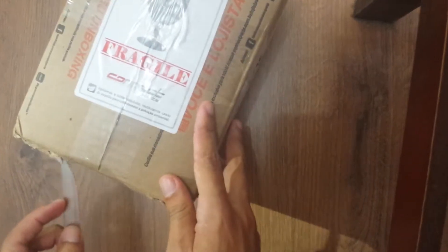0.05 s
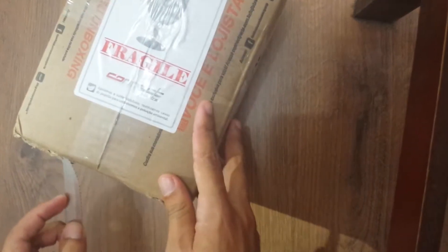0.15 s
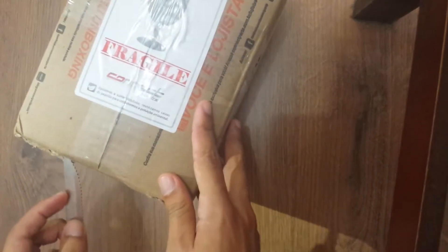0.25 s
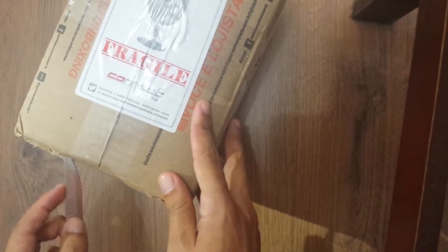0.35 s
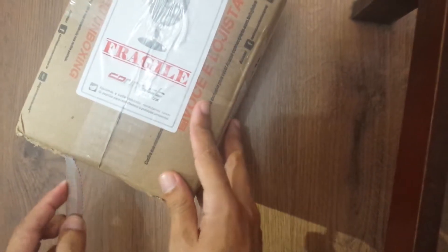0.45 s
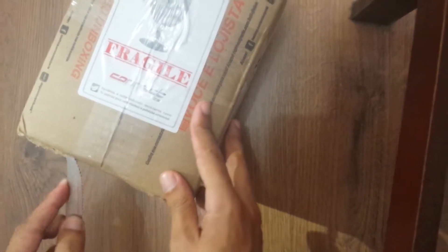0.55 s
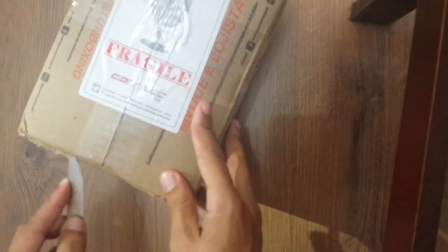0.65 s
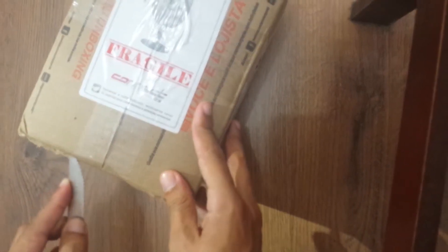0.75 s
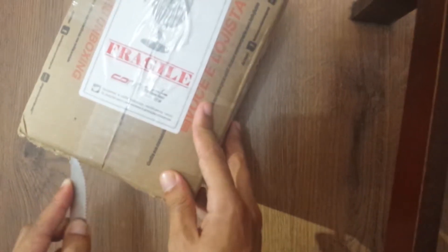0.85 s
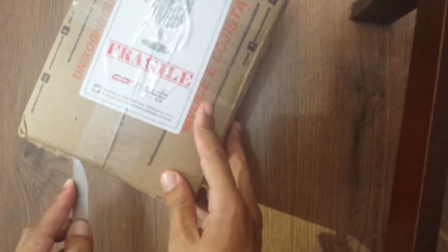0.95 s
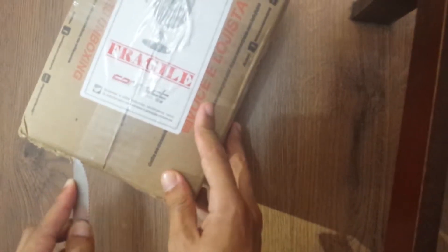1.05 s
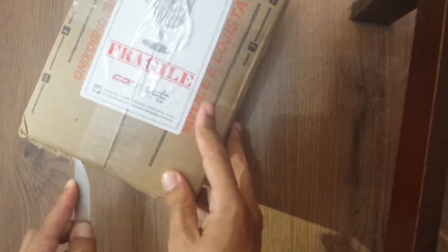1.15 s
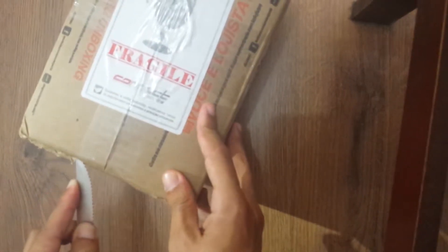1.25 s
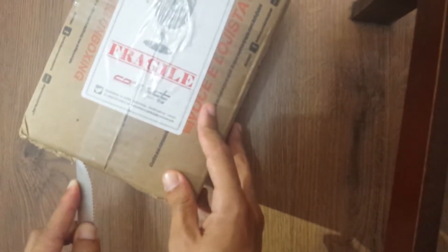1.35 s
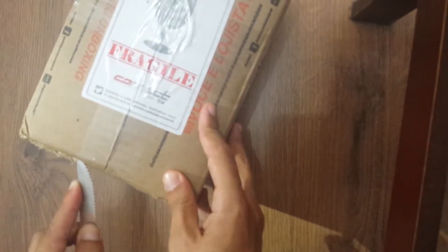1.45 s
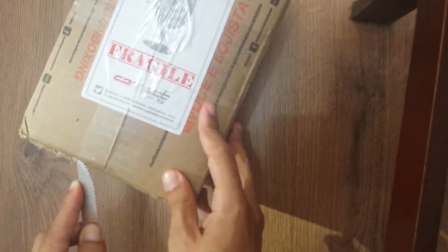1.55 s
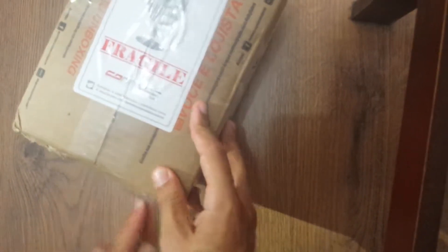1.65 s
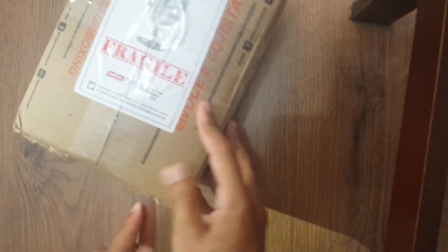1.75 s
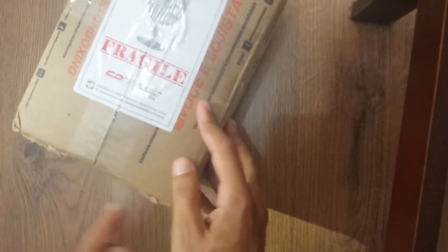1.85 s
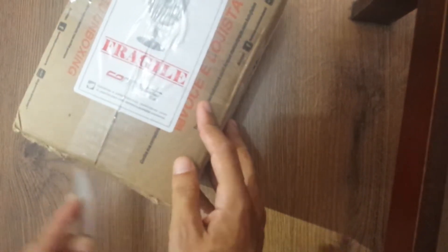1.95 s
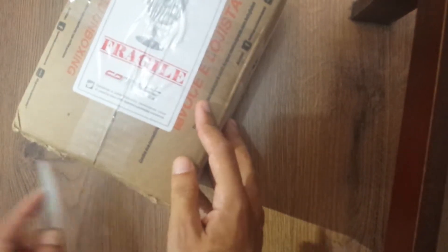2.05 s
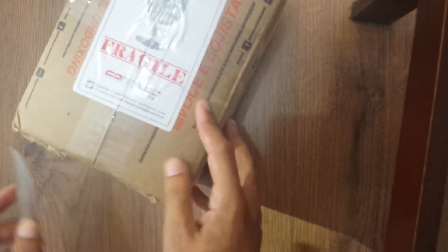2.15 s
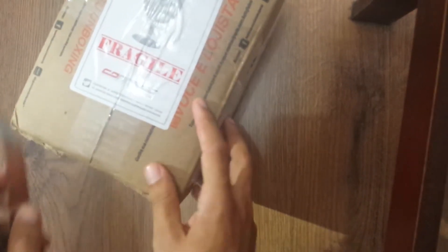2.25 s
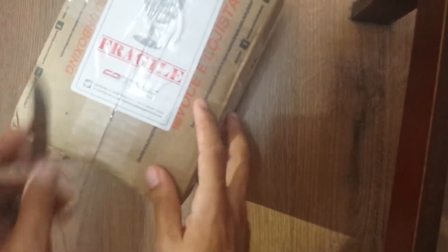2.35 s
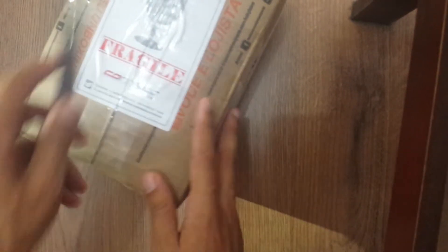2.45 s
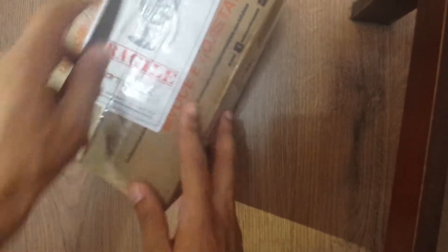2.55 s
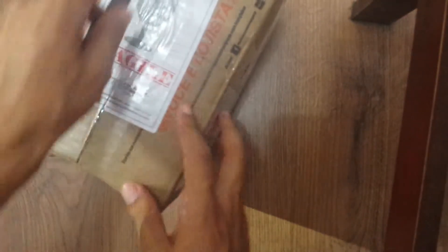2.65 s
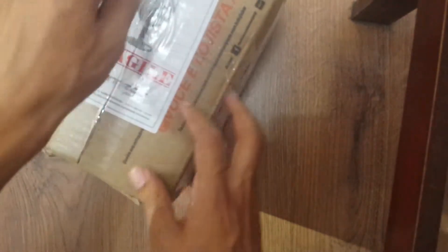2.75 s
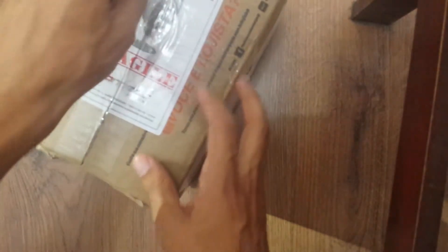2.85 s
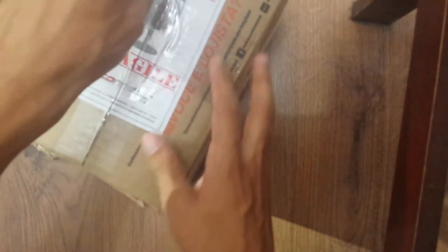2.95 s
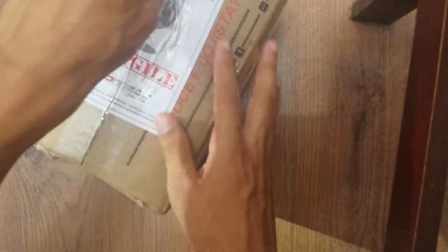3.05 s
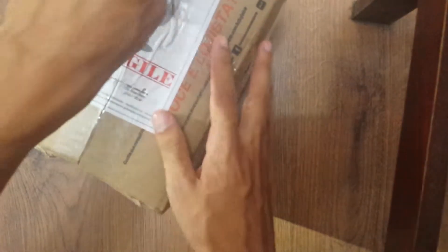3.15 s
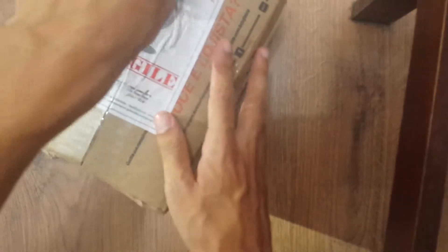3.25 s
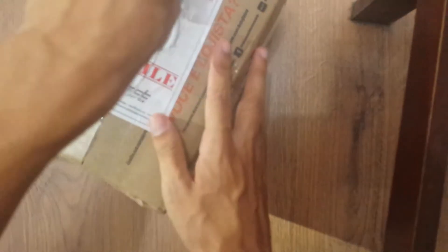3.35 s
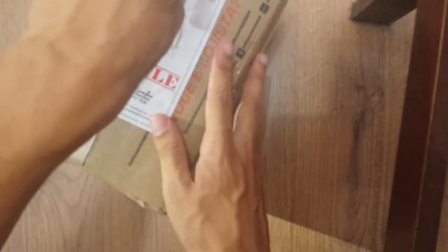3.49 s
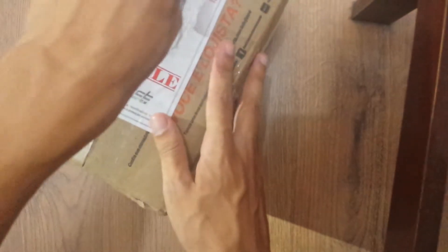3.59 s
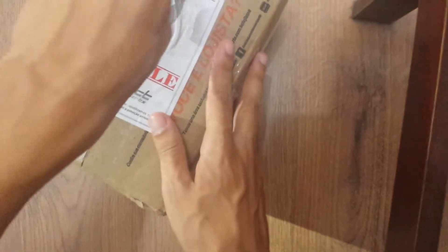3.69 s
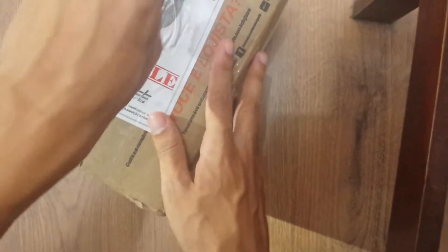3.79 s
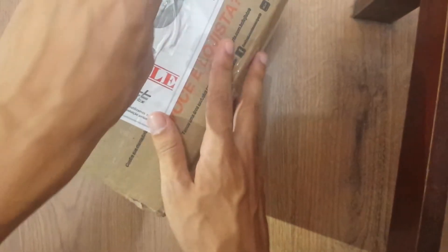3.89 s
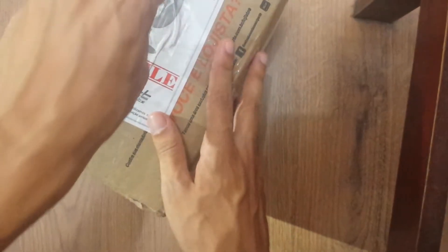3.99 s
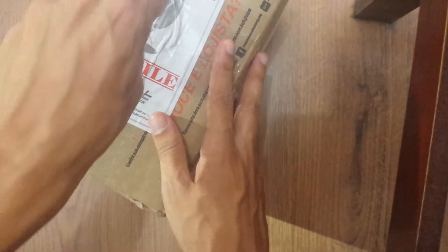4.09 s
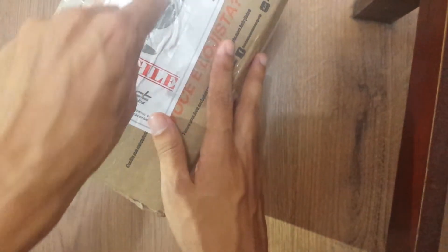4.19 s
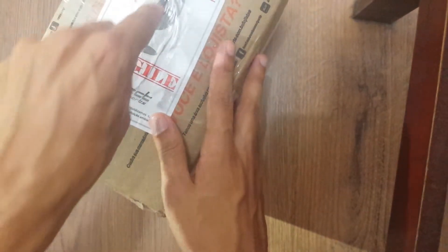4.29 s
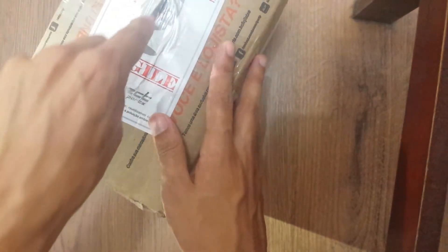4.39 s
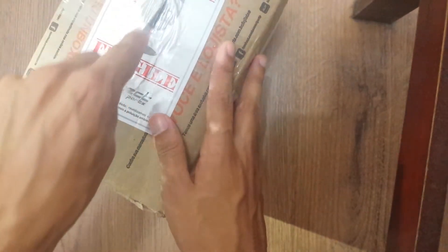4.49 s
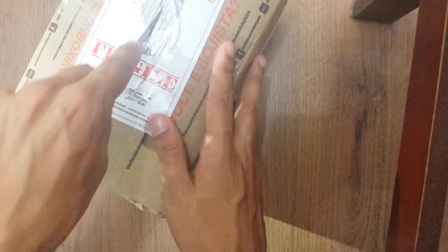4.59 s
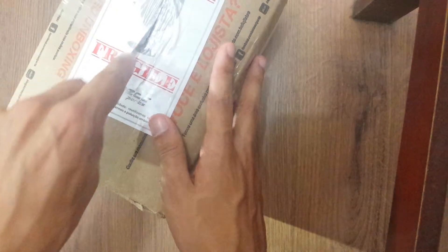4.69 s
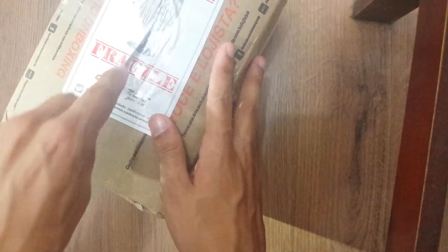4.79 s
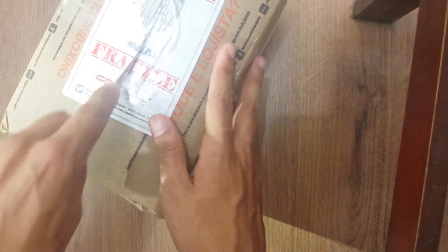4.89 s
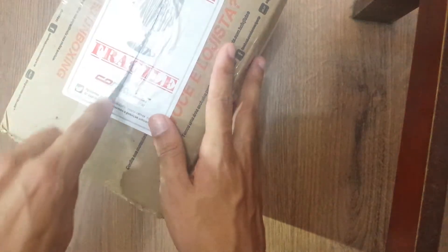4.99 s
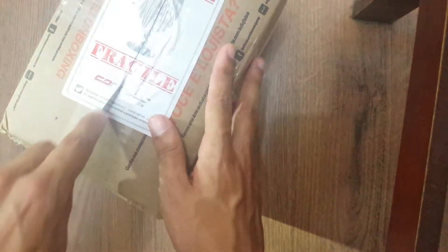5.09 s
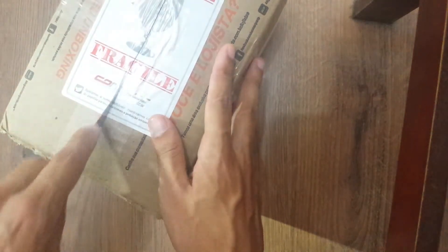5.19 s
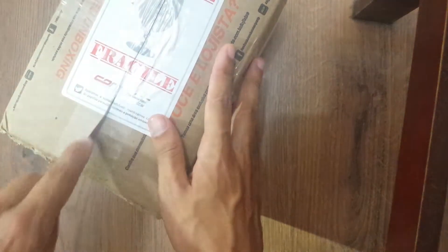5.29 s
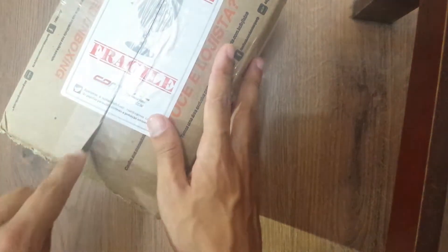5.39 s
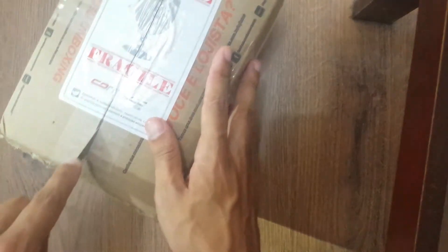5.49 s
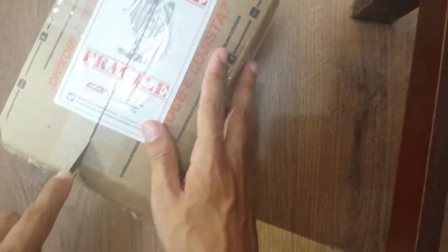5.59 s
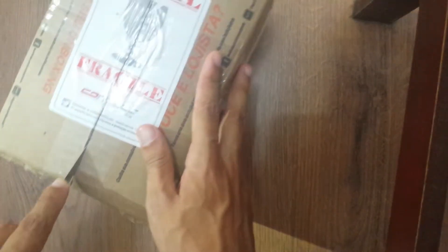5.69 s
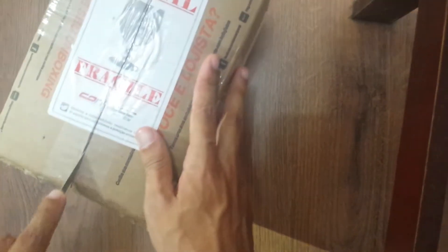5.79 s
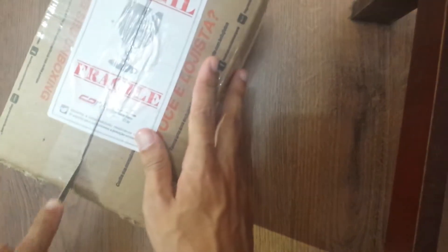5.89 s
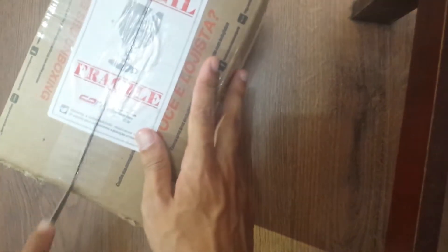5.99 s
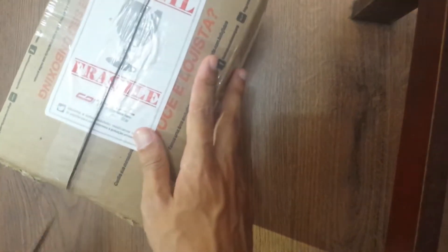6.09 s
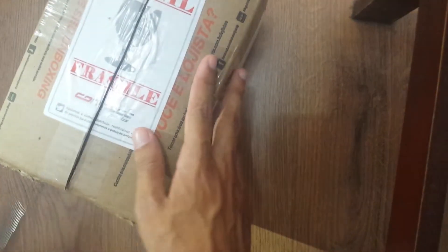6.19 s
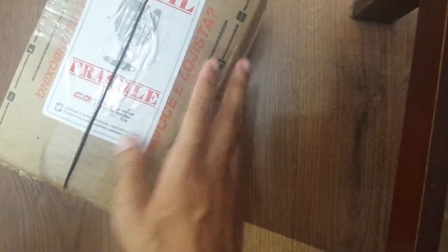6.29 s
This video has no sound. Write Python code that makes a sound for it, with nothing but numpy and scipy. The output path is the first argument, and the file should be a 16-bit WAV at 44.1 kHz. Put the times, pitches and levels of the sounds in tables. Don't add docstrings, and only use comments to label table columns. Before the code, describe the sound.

Close to the microphone in a hard-floored room, fingers and a blade lightly brush a cardboard box, with a small snap at 0.1 s, tiny film ticks and a muted tap around 1.3 s. At 1.7 s the blade slips off the edge: a sharp crack with a brief scrape and hollow thud. Soft rubbing continues, swelling near 2.6 s, with faint taps. Small snaps at 3.5 s lead to a bright burst at 3.6 s, then a gritty, uneven cut with strong snaps near 3.96 and 4.2 s. The box drums hollowly, and a knocking cluster lands at 5.1 s. Around 5.25-5.4 s comes a thin, very high chirp, then drier scraping and nicks. At 6.13 s the blade jerks free with pops and a thump, fading into quiet air, low rumble and faint hum. Direct sound favours the right; reflections are short.

```python
import sys
import numpy as np
from scipy import signal
from scipy.fft import rfft, irfft, next_fast_len
from scipy.io import wavfile
from scipy.ndimage import uniform_filter1d, map_coordinates

SR = 44100
rng = np.random.default_rng(int(sys.argv[2]) if len(sys.argv) > 2 else 0)


def magnitude_from_level(level_db):
    exponent = np.asarray(level_db, float) / 20
    return 10 ** exponent


def generate_wav(signal):
    frames = np.transpose(np.atleast_2d(signal))
    scaled = np.clip(frames, -1, 1) * 32767
    pcm = np.round(scaled).astype(np.int16)
    wavfile.write(sys.argv[1], SR, pcm)


N = 279324

# (peak t/s, level/dB, film over card/dB, rise/s, fall/s), 20 dB each way
BRUSH_STROKES = [(0.022, -66, 4, 0.03, 0.018), (0.11, -58, -3, 0.077, 0.18),
                 (0.266, -63.5, -2, 0.099, 0.018), (0.52, -69, -1.5, 0.49, 0.22),
                 (0.748, -69, 1, .02, 0.28), (0.86, -63, 1, 0.011, .03), (0.983, -52, -2, 0.08, 0.012),
                 (1.284, -63, -7, 0.0099, 0.014), (1.562, -71, 3, .03, .1), (1.654, -67, -3, .015, 0.11),
                 (2.152, -68, -6, 0.14, 0.079), (2.284, -73, -9, 0.047, 0.046), (2.4, -63.5, -20, 0.14, .4),
                 (2.632, -55, -1.5, 0.35, 0.24), (2.9, -64.5, -2, 0.052, 0.71),
                 (3.15, -67.5, -4, 0.88, 0.12), (3.292, -60.5, -4, 0.1, 0.021),
                 (3.454, -65, 1, 0.15, 0.017), (3.53, -60.5, 4.5, 0.097, 0.12),
                 (3.612, -37, 5.5, 0.0054, 0.12), (5.115, -31, -15, 0.033, 0.14)]
# (t/s, pressure level/dB, film over card/dB)
EDGE_SLIP = [(1.685, -78, 4), (1.693, -35, -3), (1.699, -34, -1), (1.72, -30.5, 0.5), (1.74, -27.5, 0.5),
             (1.757, -29.5, -3), (1.8, -45, -18), (1.84, -44.5, 0.5), (1.9, -56, -2), (1.948, -50.5, -4),
             (2.05, -104, -3)]
# (t/s, pressure level/dB, film over card/dB)
LONG_CUT = [(3.56, -88, 0), (3.72, -48, 0.5), (3.79, -54, 2), (3.945, -43.5, -2), (4.02, -43.5, -0.5),
            (4.17, -44, -4.5), (4.25, -41, 0.5), (4.31, -46, -0.5), (4.564, -48.5, 3), (4.66, -50, -2),
            (4.93, -44, -1.5), (5.059, -44, -1), (5.2, -40.5, -2), (5.432, -37, -3), (5.5, -43, -5),
            (5.7, -46.5, 5), (5.77, -45, 1.5), (5.93, -51.5, 0.5), (5.96, -45.5, -1)]
# (t/s, pressure level/dB, film over card/dB)
FINAL_JERK = [
    (5.95, -79, 15),
    (5.976, -49.5, 5.5),
    (6.06, -44, 7),
    (6.1, -36, -1),
    (6.134, -36.5, 0),
    (6.154, -46, -49),
    (6.218, -64, -11),
    (6.33, -73, 14.5),
]
# (t/s, level over pressure/dB)
LID_DRUMMING = [(0, 12), (0.12, 2), (0.45, 8), (1.0, -4.5), (1.65, -5), (1.72, -6.5), (1.86, 1),
                (2.0, -0.5), (2.6, 2.5), (3.4, -2.5), (3.88, -0.5), (4.0, 0.5), (4.6, 8.5), (5.0, 0.5),
                (5.15, -1), (5.4, -5), (5.9, 1.5), (6.16, -4)]
# (t/s, centre f/Hz, height/dB)
FILM_RING = [(3.75, 9400, 3), (3.86, 8720, 6), (4.12, 8450, 3.5), (4.42, 8600, 1), (4.5, 10200, 8.5),
             (4.62, 10100, 4), (4.72, 9000, 5), (5.05, 9000, 7.5), (5.26, 8800, 6), (5.35, 9760, 10),
             (5.48, 8400, -3), (5.97, 8350, 5.5), (6.15, 8500, 8.5), (6.2, 8240, 0)]
# (f/Hz, level/dB)
STEEL_SPECTRUM = [(530, -28.5), (900, -7.5), (1210, -10), (1590, -6), (1900, -6.5), (3150, -6),
                  (4390, -4.5), (7050, -6.5), (8320, -6), (13300, -11), (15200, -18)]
# (t/s, peak level/dB, box knock/dB, brightness/dB per octave)
TAPE_SNAPS = [(0.0871, -31, -14, 1), (1.702, -26, -38, -2), (1.705, -14, -21, -1), (3.288, -45, 6, -4),
              (3.4794, -31.5, -15, 3.5), (3.499, -24.5, -9.5, 1.5), (3.516, -40, -24, -2),
              (3.601, -27, -32, 2), (3.603, -6.5, -34, 1.8), (3.6057, -12, -26, -1), (3.6084, -19, -31, 2),
              (3.6149, -17, -32, 2), (3.62, -13, -22, -1), (3.634, -18, -28, 0), (3.673, -20, -34, -1),
              (3.6762, -16.5, -30, 0.5), (3.9564, -6, -27, 1.5), (3.9711, -7, -30, -0.5),
              (3.974, -16, -20, -1), (4.057, -22, -3, -4.5), (4.1809, -3.5, -23, 8), (4.183, -10, -6, 1.5),
              (4.187, -13, -14.5, 4), (4.197, -16, -9, -3), (4.2169, -9.5, -37, 5), (4.2215, -9.5, -30, 8),
              (4.223, -21, -29, 1), (4.3137, -20.5, -9, -2), (4.4443, -30.5, -1, -4),
              (4.4606, -25, -11, -2.5), (4.7154, -26.5, -3.5, 4), (4.726, -26, -14, 0.5),
              (4.9774, -17, -10, -4.5), (5.0691, -18.5, 1.5, -3), (5.076, -9, -15, -1),
              (5.082, -14, -13, 0), (5.0841, -12.5, -10, -2.5), (5.0864, -14.5, -13, -4),
              (5.088, -8, -6.5, -2), (5.1006, -11.5, -9.5, 4), (5.9676, -19, -31, 5), (6.1281, -19, -18, 2),
              (6.1321, -9.5, -20, 5), (6.1337, -13.5, -15, 1.5), (6.137, -19.5, -6.5, 2),
              (6.139, -21, -10, 3)]
# (f/Hz, level/dB)
CRACK_SPECTRUM = [(290, -66), (500, 2.5), (860, -3.5), (1150, 1), (1440, -6.5), (1890, 0.5), (2440, -3),
                  (8220, -1), (12400, -4), (15200, -16)]
# (peak t/s, level/dB, centre f/Hz)
CHIRP_BUNCHES = [(5.256, -22.5, 13200), (5.285, -23, 9250), (5.3, -17, 13500), (5.314, -17, 9500),
                 (5.334, -13, 8640), (5.336, -11, 13400), (5.34, -12.5, 10000), (5.342, -8, 13800),
                 (5.349, -6, 13870), (5.355, -11, 12600), (5.362, -10.5, 14100), (5.375, -18, 12300),
                 (5.432, -31, 9900), (5.512, -25.5, 10500), (5.515, -24.5, 8200)]
# (t/s, peak level/dB, centre f/Hz)
FILM_TICKS = [(0.017, -47, 8500), (0.229, -45, 8280), (0.258, -50, 4490), (0.4514, -65, 6500),
              (0.6874, -56.5, 6020), (0.751, -50, 5980), (0.826, -50, 5290), (0.863, -44, 9900),
              (0.864, -46.5, 1460), (0.8794, -50, 9550), (0.9333, -46, 8900), (0.9483, -41, 8550),
              (0.9795, -30, 11000), (0.9898, -37.5, 8200), (1.562, -47, 8000), (1.6686, -51, 8310),
              (1.7025, -6.5, 6640), (1.713, -18, 8050), (1.7235, -16, 6200), (1.953, -35.5, 8100),
              (3.455, -62, 5110), (3.5984, -35, 9000),
              (3.778, -18.5, 10000), (4.164, -33, 1200), (4.422, -32.5, 7500), (5.304, -17, 10500),
              (5.314, -29, 9800), (5.4194, -28, 13400), (5.44, -27, 9500), (5.4508, -24, 8300),
              (5.5234, -24.5, 8100), (5.5501, -19, 10200), (5.567, -31, 10000), (5.572, -38, 9000),
              (5.678, -30, 7860), (5.6944, -31, 8260), (5.7148, -21.5, 7900), (5.806, -23.5, 8000),
              (5.941, -28, 8820), (5.964, -20.5, 12000), (6.0066, -28, 10600), (6.071, -26, 8180),
              (6.1036, -20, 8300), (6.1137, -16, 8600), (6.117, -14, 8800), (6.126, -24, 8500),
              (6.29, -39, 8930), (6.319, -46, 6550)]
# (t/s, peak level/dB, panel f/Hz)
BOX_TAPS = [(0.012, -45.5, 165), (0.096, -33, 1107), (0.112, -38, 1040), (0.136, -40, 970),
            (0.441, -49, 476), (0.84, -43, 1380), (1.281, -31.5, 310), (1.299, -44, 340), (1.702, -25, 217),
            (1.727, -23, 257), (1.755, -17, 244), (1.94, -43, 268), (2.38, -36, 318), (2.486, -38, 292),
            (2.725, -39, 333), (3.109, -38.5, 210), (3.273, -31.5, 166), (3.289, -34.5, 380),
            (3.881, -26.5, 303), (4.0562, -15, 303), (4.184, -18, 372), (4.186, -25, 780),
            (4.197, -22, 366), (4.217, -22, 800), (4.219, -21, 334), (4.29, -26.5, 330), (4.316, -27, 343),
            (4.686, -38, 296), (4.849, -32, 295), (4.933, -26.5, 244), (4.977, -30.5, 420),
            (4.979, -26, 220), (5.076, -20, 210), (5.085, -12, 683), (5.086, -13, 950), (5.093, -14.5, 210),
            (5.096, -20, 303), (5.102, -22, 820), (5.11, -15, 970), (6.116, -23, 202), (6.13, -16, 1005),
            (6.134, -25, 760), (6.14, -17.5, 210)]
# (f/Hz, width/Hz, level/dB)
BOX_MODES = [(210, 66, -0.5), (275.1, 10.6, 7.5), (320, 36, 1.5), (535, 97, -2), (678.5, 60, 1),
             (794, 40.5, 6.5), (950, 38, 0.5), (1069, 28, 4), (1213, 140, -8.5)]
# (f/Hz, level/dB)
FAR_PORT_SHADOW = [(200, -1), (700, -0.5), (2400, -20.5), (8000, -69), (15000, -17)]
# (f/Hz, t60/s)
ROOM_T60 = [(100, 0.56), (500, 0.29), (2000, 0.35), (8000, 0.37), (15000, 0.22)]
# (f/Hz, correlation)
ROOM_LIKENESS = [(100, 0.81), (300, 0.86), (600, 0.75), (1200, -0.42), (3000, -0.056)]
# (f/Hz, level/dB)
ROOM_LEFT_TILT = [(300, 2), (2000, 5.5), (8000, 0), (15000, -5)]
# (f/Hz, level/dB)
AIR_SPECTRUM = [(12, -42), (20, -17), (32, -50), (74, -15), (121, 6), (148, -8), (195, -12.5), (330, -9.5),
                (379, -13), (947, -21.5), (2300, -26), (4120, -28.5), (5150, -26), (15200, -36)]
# (f/Hz, correlation)
AIR_LIKENESS = [(60, 0.97), (130, 0.97), (290, 0.63), (640, 0.16), (1410, 0.35), (3100, -0.32),
                (6820, 0.016), (15000, -0.32)]
# (t/s, level/dB)
FLOOR_RUMBLE = [(0, -70.5), (1.16, -69), (1.7, -61), (1.83, -55), (2.03, -67), (2.5, -61.5), (2.9, -66),
                (4.3, -55), (5.11, -56.5), (5.6, -55.5), (6.01, -55.5), (6.14, -46), (6.33, -59)]

FILM_RING_WIDTH_HZ = 230
SNAP_ROOM_DB, SNAP_LEFT_DB = -6.5, -0.5
SLACK_DB, RETENSION_S = -1, 0.015
CHIRP_RISE_S, CHIRP_FALL_S = 0.014, 0.022
TICK_T60_S, TICK_OCTAVES = 0.006, 0.6
LEFT_PORT_LAG_S = 0.00042
AIR_DB = -55.5
HUM_DB, HUM_FOLLOWS = -64, 0.98


def friction():
    card_gain, film_gain = pressure()
    lid_db, = curves(LID_DRUMMING)
    slip_chance = 1200 / SR * magnitude_from_level(3 * wobble(40))
    slip_size = magnitude_from_level(np.minimum(2.9 * rng.exponential(size=N), 14))
    slips = (rng.random(N) < slip_chance) * slip_size
    slip_envelope = signal.lfilter([1], [1, -0.95], slips)
    grains = unit(slip_envelope * rng.standard_normal(N))
    hiss = unit(magnitude_from_level(1.6 * wobble(40) + 2.5 * wobble(130)) * rng.standard_normal(N))
    force = 0.61 * grains + 0.76 * hiss

    scrape = filtered(patchy(force, depth_db=1.8), coloured(STEEL_SPECTRUM))
    card = filtered(scrape, lambda hz: 1 / (1 + (hz / 6500) ** 6))
    film = ringing(unit(scrape - card))
    drum = unit(filtered(force * magnitude_from_level(1.8 * wobble(6.6)), box))
    flaps = unit(filtered(scrape, lambda hz: 1 / (1 + (hz / 1250) ** 8)))
    drum = drum + magnitude_from_level(-11) * flaps

    card_sound = magnitude_from_level(-2.13) * card_gain * unit(card)
    film_sound = magnitude_from_level(5.0) * film_gain * film
    return card_sound + film_sound + magnitude_from_level(lid_db - 3.0) * card_gain * drum


def pressure():
    strokes = []
    for s, db, film_db, rise_s, fall_s in BRUSH_STROKES:
        strokes.append((db + swell(s, rise_s, fall_s), film_db))
    for rows in (EDGE_SLIP, LONG_CUT, FINAL_JERK):
        level_db, film_db = curves(rows)
        fade_in_db = swell(rows[0][0], 0.01, 1e6)
        fade_out_db = swell(rows[-1][0], 1e6, 0.03)
        strokes.append((level_db + fade_in_db + fade_out_db, film_db))
    card_power = sum(magnitude_from_level(2 * db) for db, _ in strokes)
    film_power = sum(magnitude_from_level(2 * db) * magnitude_from_level(2 * film_db) for db, film_db in strokes)
    return np.sqrt(card_power), np.sqrt(film_power)


def patchy(x, depth_db):
    z = signal.stft(x, nperseg=256)[2]
    field = uniform_filter1d(rng.standard_normal(z.shape), 4, 0)
    field = uniform_filter1d(field, 30, 1)
    return signal.istft(z * magnitude_from_level(depth_db * unit(field)), nperseg=256)[1][:N]


def ringing(x):
    hz, t, z = signal.stft(x, SR, nperseg=256)
    s, centre_hz, height_db = np.transpose(FILM_RING)
    offset_hz = hz[:, None] - np.interp(t, s, centre_hz)
    peak = np.exp(-0.5 * (offset_hz / FILM_RING_WIDTH_HZ) ** 2)
    gain_db = np.interp(t, s, height_db, left=0) * peak
    return signal.istft(z * magnitude_from_level(gain_db), SR, nperseg=256)[1][:N]


def snaps():
    near, far = np.zeros((2, N + 4096)), np.zeros(N + 4096)
    t = np.arange(4096) / SR
    lead = 40
    spike = 1.0 * (np.arange(len(t)) == lead)
    waits_s = np.diff([-1] + [row[0] for row in TAPE_SNAPS])
    for (s, db, knock_db, tilt_db), wait_s in zip(TAPE_SNAPS, waits_s):
        room_db = SNAP_ROOM_DB + SLACK_DB * np.exp(-abs(wait_s) / RETENSION_S)
        tear_s = 0.0067 * magnitude_from_level(0.15 * (knock_db + 15))
        tear = np.roll(rng.standard_normal(len(t)) * magnitude_from_level(-30 * t / tear_s), lead)
        crack = filtered(np.array([tear + 3.5 * spike, 6 * spike]), coloured(CRACK_SPECTRUM, tilt_db))
        knock = filtered(np.array([tear + 2.5 * spike, 6 * spike]), box)
        crack = crack / abs(crack[0]).max()
        knock = knock / abs(knock[0]).max()
        sound = magnitude_from_level(db + 7.5) * (crack + magnitude_from_level(knock_db - 9.5) * knock)
        i = round(s * SR) - lead
        near[:, i:i + len(t)] += magnitude_from_level([[SNAP_LEFT_DB], [0]]) * sound[0]
        far[i:i + len(t)] += magnitude_from_level(room_db) * sound[1]
    return near[:, :N], far[:N]


def squeak():
    bunches_db = np.array([db + swell(s, CHIRP_RISE_S, CHIRP_FALL_S) for s, db, _ in CHIRP_BUNCHES])
    level_db = bunches_db.max(axis=0)
    out, t = np.zeros(N + 400), np.arange(400) / SR
    envelope = magnitude_from_level(-60 * t / 0.0086) * (1 - np.exp(-t / 0.00056))
    start_s = CHIRP_BUNCHES[0][0] - CHIRP_RISE_S
    end_s = CHIRP_BUNCHES[-1][0] + CHIRP_FALL_S
    for when, a, b, size, *luck in rng.random((1300, 4 + len(CHIRP_BUNCHES))):
        i = int((start_s + when * (end_s - start_s)) * SR)
        bunch = np.argmax(bunches_db[:, i] + 12 * np.array(luck))
        detune = np.exp(0.088 * (a - b) - 0.5 * (a * b) ** 3)
        hz = min(CHIRP_BUNCHES[bunch][2] * detune, 15300)
        gain = magnitude_from_level(bunches_db[bunch, i] - 7 - 3 * np.log(size + 1e-3))
        out[i:i + 400] += gain * np.sin(2 * np.pi * hz * t) * envelope
    fizz = unit(filtered(rng.standard_normal(N), lambda hz: 1 / (1 + (9000 / (hz + 1)) ** 8)))
    sounding = (np.arange(N) > start_s * SR) & (np.arange(N) < end_s * SR)
    return (out[:N] + magnitude_from_level(level_db - 9) * sounding * fizz) * magnitude_from_level(3.5 * wobble(330) - 1)


def ticks():
    out, t = np.zeros(N + 512), np.arange(512) / SR
    for s, db, centre_hz in FILM_TICKS:
        burst = rng.standard_normal(len(t)) * magnitude_from_level(-60 * t / TICK_T60_S) + 1.1 * (t == t[1])

        def band(hz):
            octaves = np.log2(hz / centre_hz + 0.0013)
            return 1 / (1 + (octaves / TICK_OCTAVES) ** 4)

        click = filtered(burst, band)
        out[round(s * SR):][:len(t)] += magnitude_from_level(db + 5.5) * click / abs(click).max()
    return out[:N]


def taps():
    out, t = np.zeros(N + 4096), np.arange(4096) / SR
    ring = filtered(np.exp(-t / 0.00009) * t, box)
    ring = ring / abs(ring).max()
    for s, db, hz in BOX_TAPS:
        t60_s = 0.036 * (300 / hz) ** 0.18
        thump = np.sin(2 * np.pi * hz * t) * magnitude_from_level(-60 * t / t60_s) * (1 - np.exp(-t / 0.0025))
        ring_gain = 0.18 * min(1, (400 / hz) ** 0.5)
        out[round(s * SR):][:len(t)] += magnitude_from_level(db) * (thump + ring_gain * ring)
    return out[:N]


def box(hz):
    total = 0
    for k, (centre_hz, width_hz, db) in enumerate(BOX_MODES):
        damping = 1j * hz * width_hz
        total = total + (-1) ** k * magnitude_from_level(db) * damping / (centre_hz ** 2 - hz ** 2 + damping)
    return total


def ports(x):
    def far_path(hz):
        return magnitude_from_level(along(FAR_PORT_SHADOW, hz)) * np.exp(-2j * np.pi * hz * LEFT_PORT_LAG_S)

    return np.array([filtered(x[0], far_path), x[1]])


def room(x):
    out, step = np.zeros((2, N + 2 * SR)), SR // 4
    for i in range(0, N, step):
        hz, t, z = signal.stft(pair(ROOM_LIKENESS, SR * 3 // 5), SR, nperseg=256)
        left_only = np.array([1, 0])[:, None, None]
        side = magnitude_from_level(along(ROOM_LEFT_TILT, hz)[:, None] * left_only)
        decay = magnitude_from_level(-60 * t / along(ROOM_T60, hz)[:, None])
        tail = signal.istft(z * side * decay, SR, nperseg=256)[1]
        tail = tail * (1 - np.exp(-np.arange(tail.shape[1]) / SR / 0.00073))
        wet = signal.fftconvolve(x[None, i:i + step], tail / np.linalg.norm(tail[1]), axes=1)
        out[:, i:i + wet.shape[1]] += wet
    return out[:, :N]


def room_tone():
    rumble_db, = curves(FLOOR_RUMBLE)
    hum_db = HUM_DB + HUM_FOLLOWS * (rumble_db - rumble_db.mean())
    air = unit(filtered(pair(AIR_LIKENESS, N), coloured(AIR_SPECTRUM)))
    air = magnitude_from_level(AIR_DB - 5.5 + 1.0 * wobble(3.9)) * air
    rumble = unit(filtered(pair([(76, 0.77)], N), lambda hz: 1 / (1 + ((hz - 76) / 18) ** 2)))
    hum_phase = 2 * np.pi * 120 * np.arange(N) / SR + 1.6 * wobble(6.7)
    hum = np.sin(hum_phase) * magnitude_from_level(4 + 0.48 * wobble(5.28))
    sway = unit(filtered(rng.standard_normal(N), lambda hz: 1 / (1 + ((hz - 32) / 12) ** 2)))
    air[0] += magnitude_from_level(rumble_db - 9) * sway
    return air + magnitude_from_level(rumble_db) * rumble + magnitude_from_level(hum_db + 2.0) * hum


def swell(s, rise_s, fall_s):
    t = np.arange(N) / SR - s
    return -20 * np.where(t < 0, -t / rise_s, t / fall_s)


def coloured(spectrum, tilt_db=0):
    def response(hz):
        octaves = np.log2(np.clip(hz, 1000, None) / 5000)
        level_db = along(spectrum[:-1], hz) + np.clip(tilt_db, -5, 5) * octaves
        return magnitude_from_level(level_db) * (hz > spectrum[0][0])

    return response


def pair(alike, n):
    def mid_side(hz):
        turn = np.arccos(np.clip(along(alike, hz), -1, 1)) / 2
        return np.array([np.cos(turn), np.sin(turn)])

    mid, side = filtered(rng.standard_normal((2, n)), mid_side)
    return np.array([mid + side, mid - side])


def filtered(x, response):
    n = x.shape[-1]
    m = next_fast_len(n + 8192)
    return irfft(rfft(x, m) * response(np.fft.rfftfreq(m, 1 / SR)), m)[..., :n]


def along(points, hz):
    f, v = np.transpose(points)
    return np.interp(np.log(hz + 1), np.log(f + 1), v)


def curves(rows):
    s, *cols = np.transpose(rows)
    return [np.interp(np.arange(N) / SR, s, c) for c in cols]


def wobble(rate_hz):
    knots = rng.standard_normal(int(N * rate_hz / SR) + 4)
    return map_coordinates(knots, [np.arange(N) * rate_hz / SR])


def unit(x):
    return x / np.sqrt(np.mean(x ** 2) + 1e-20)


def scene():
    snap, snap_to_room = snaps()
    rub, chirp, thud = friction(), squeak() + ticks(), taps()
    echo = room(magnitude_from_level(1.5) * snap_to_room + magnitude_from_level(-6.5) * rub + magnitude_from_level(-8.0) * chirp + magnitude_from_level(-9.5) * thud)
    return ports(snap + rub + chirp + thud) + echo + room_tone()


def roll_off(x):
    return signal.sosfilt(signal.butter(12, 16810, fs=SR, output="sos"), x)


def record(dry):
    def microphone(hz):
        band_limit = np.clip((15500 + 300 - hz) / 500, 0, 1) ** 2
        return band_limit / np.sqrt(1 + (hz / 14000) ** 6)

    mix = filtered(dry, microphone)
    return roll_off(mix)


dry = scene()
out = record(dry)
generate_wav(out)
```